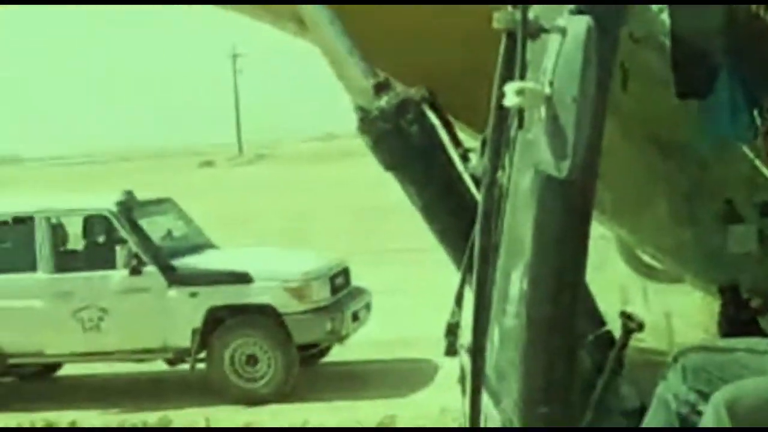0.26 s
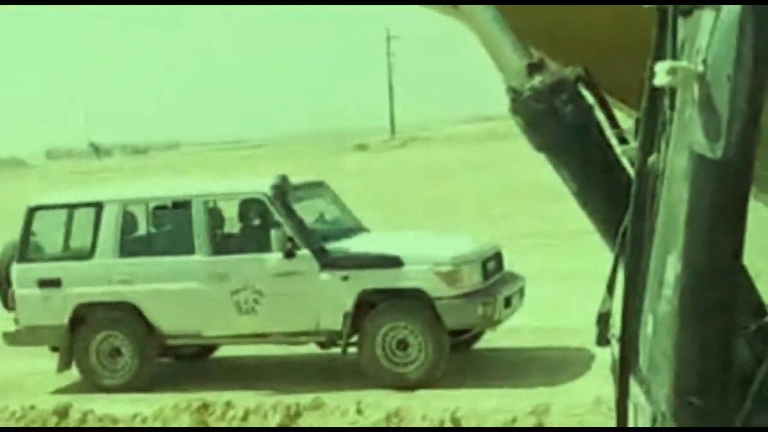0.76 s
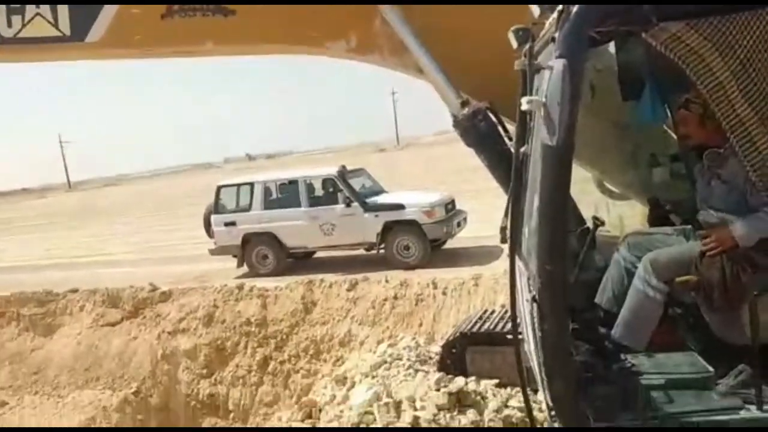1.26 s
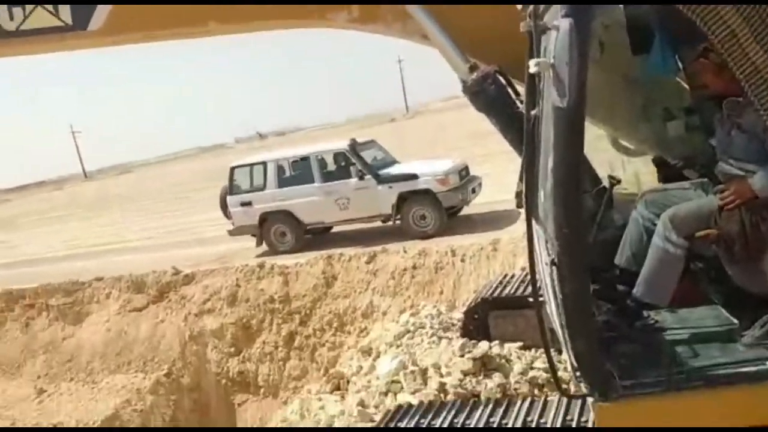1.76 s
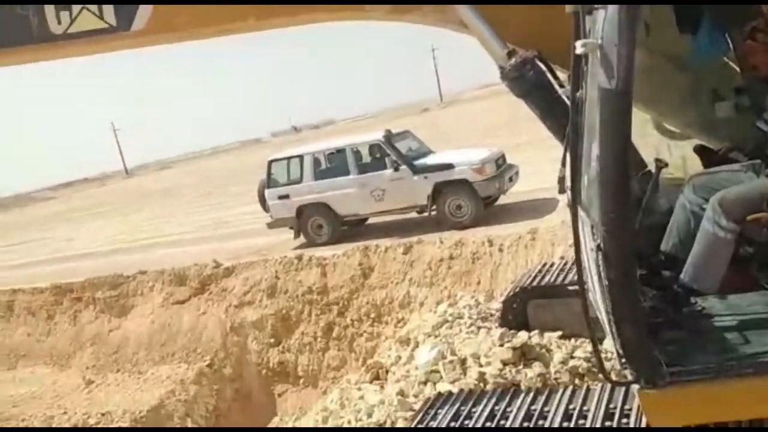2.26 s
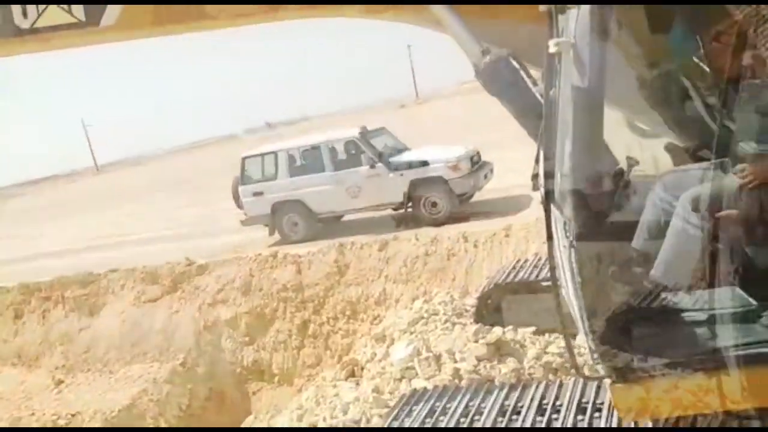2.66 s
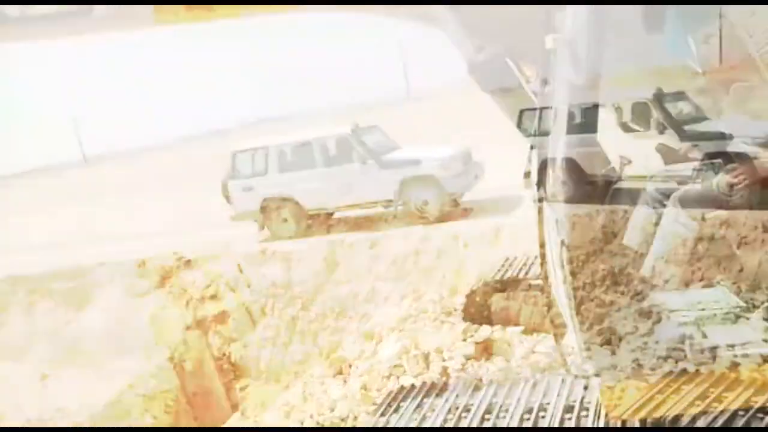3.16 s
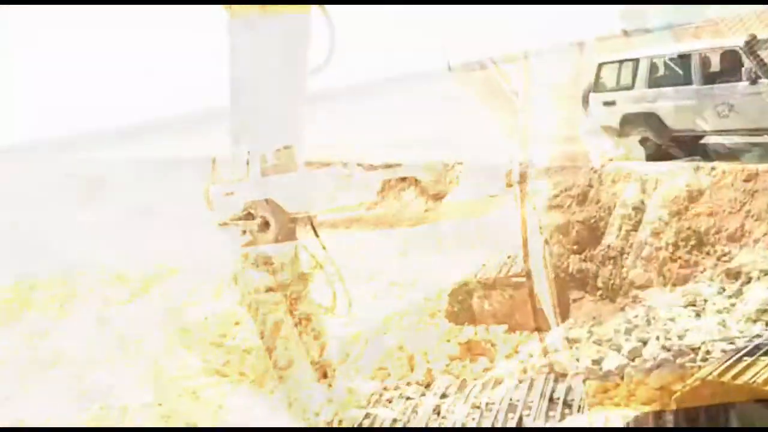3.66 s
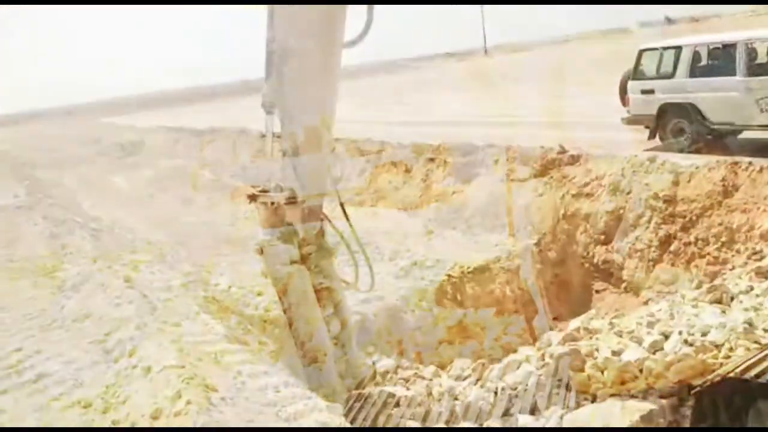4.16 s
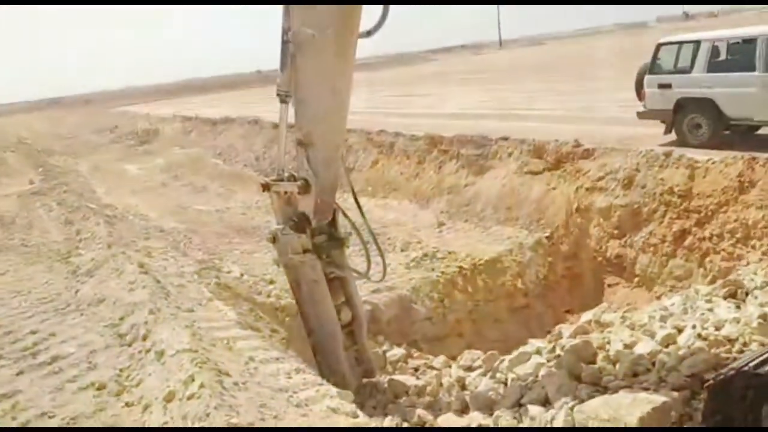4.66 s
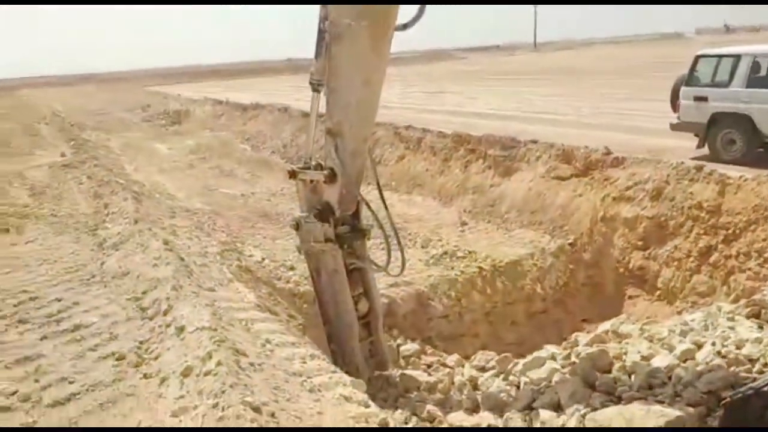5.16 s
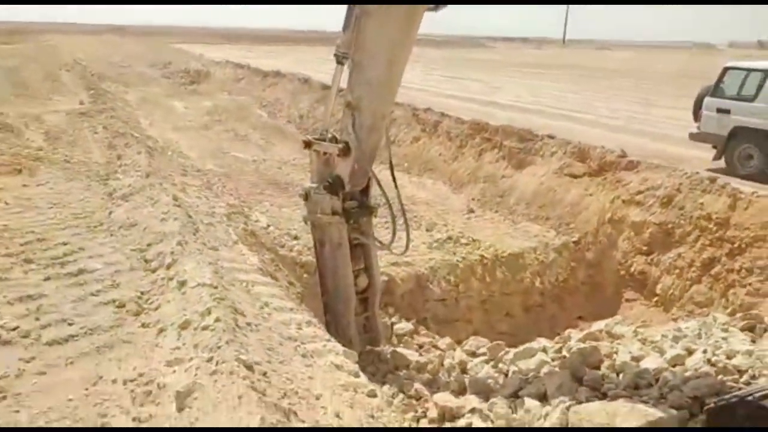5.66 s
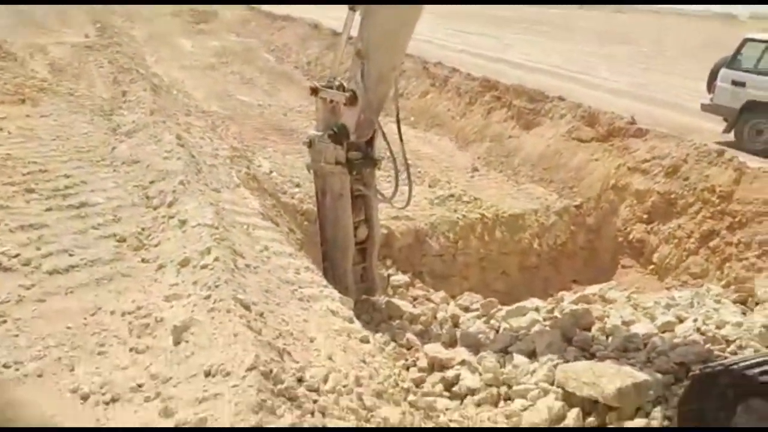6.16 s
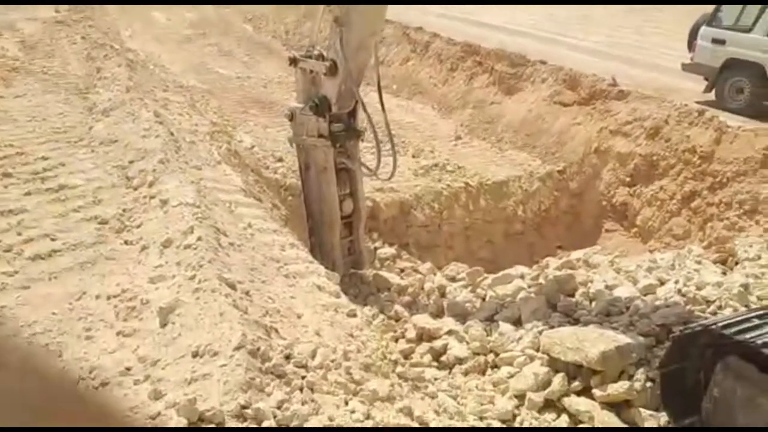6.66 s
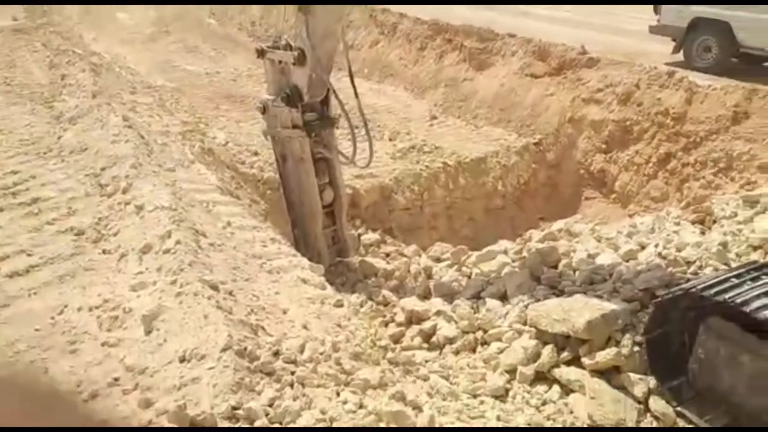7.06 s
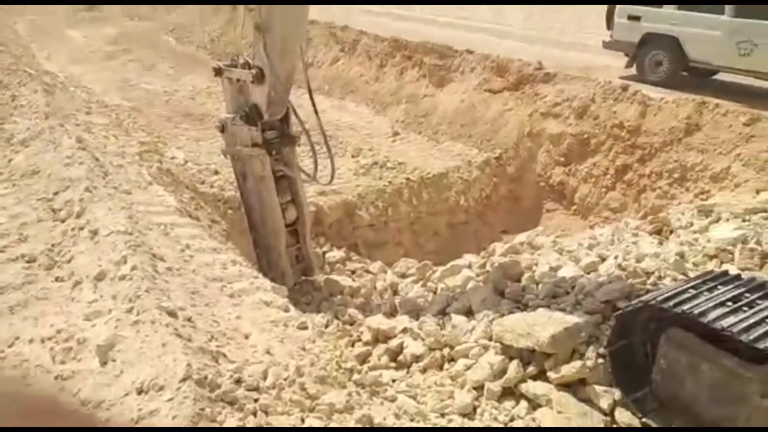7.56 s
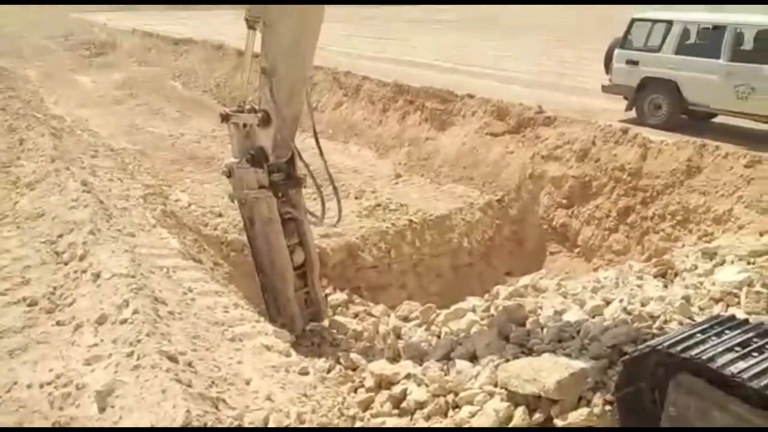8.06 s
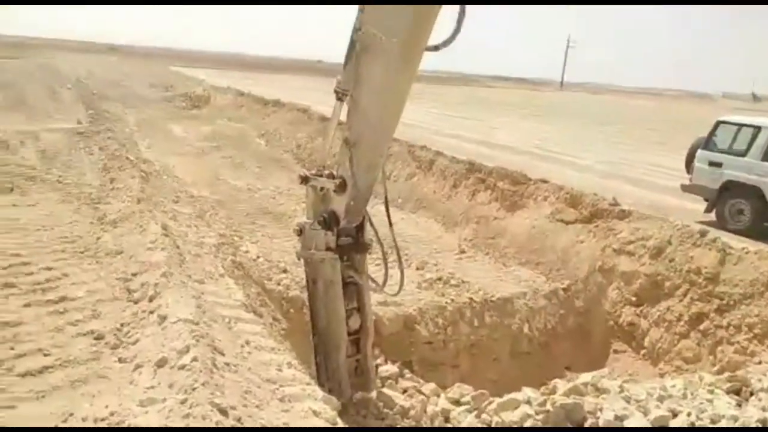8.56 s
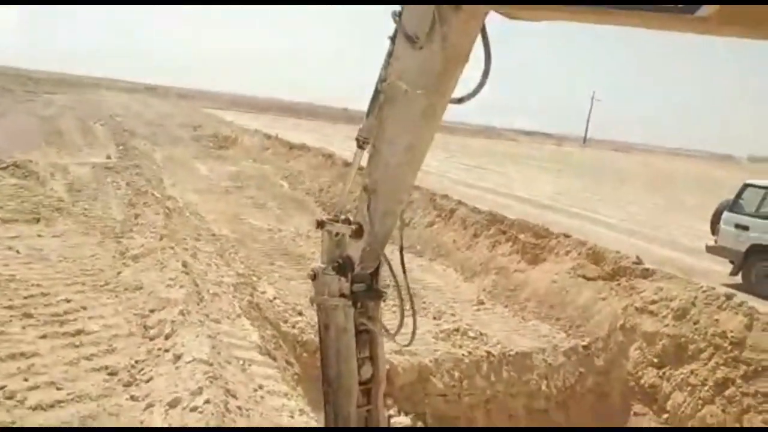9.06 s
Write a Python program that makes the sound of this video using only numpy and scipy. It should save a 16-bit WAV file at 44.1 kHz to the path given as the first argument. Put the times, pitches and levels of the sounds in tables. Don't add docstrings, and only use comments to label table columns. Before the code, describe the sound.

An excavator's hydraulic breaker hammers rock in ringing, crunching blows over a roaring diesel engine, then pauses with squeals and clanks before loose strikes.

```python
import sys
import numpy as np
from scipy import signal
from scipy.fft import rfft, irfft
from scipy.io import wavfile
from scipy.ndimage import uniform_filter1d, minimum_filter1d, map_coordinates

SR = 44100
rng = np.random.default_rng(int(sys.argv[2]) if len(sys.argv) > 2 else 0)


def transcribe(signal):
    frames = np.atleast_2d(signal).T
    limited = np.clip(frames, -1, 1)
    pcm = np.round(limited * 32767).astype(np.int16)
    wavfile.write(sys.argv[1], SR, pcm)


def undo_db(level):
    steps = np.asarray(level, float) / 20
    return 10 ** steps


N = 410130
T, HZ = np.arange(N) / SR, np.fft.rfftfreq(N, 1 / SR)

# time in s, delay in samples of first breaker, second breaker, machine body.
LATE = [(0, 17, 14, -20), (2.3, 14, 14, -20), (4, 15, 3, -20), (5.2, 15, 0, -20), (6.5, 15, 0, -20),
        (7.5, 15, -18, -19), (9.3, 15, -18, -16)]
# time in s, firings per s.
SPEED = [(0, 88), (1.7, 88), (3.5, 87.5), (6.2, 87.3), (6.9, 88), (8.1, 87), (9.3, 87.5)]


def evened(x):
    return x / np.sqrt(np.mean(x ** 2) + 1e-20)


def read(points, hz):
    f, value = np.transpose(points)
    return np.interp(np.log(hz + 1), np.log(f + 1), value)


def curve(rows, axis):
    rows = np.array(rows)
    return np.interp(T, rows[:, 0], rows[:, axis])


def noise(gain):
    return irfft(rfft(rng.standard_normal((2, N))) * gain, N)


def drift(hz):
    return evened(irfft(rfft(rng.standard_normal(N)) / (1 + (HZ / hz) ** 4), N))


def train(times_s, db):
    out = np.zeros(N)
    out[np.round(times_s * SR).astype(int)] = undo_db(db)
    return out


def span(start_s, length_s, edge_s):
    return np.clip(np.minimum(T - start_s, start_s + length_s - T) / edge_s, 0, 1)


def ring(modes, clicks, push_s, fresh, hold):
    t = np.arange(SR // 3) / SR
    body = 0
    for k, (hz, db, t60_s) in enumerate(modes):
        phases = [[0], [k * 2.6]]
        body = body + undo_db(db - 60 * t / t60_s / hold) * np.sin(2 * np.pi * hz * t + phases)
    shape = np.exp(-t[:2000] / push_s)
    shape = shape / np.linalg.norm(shape)
    rattle = fresh * signal.oaconvolve(clicks, shape)[:N] * rng.standard_normal(N)
    swing_up = 1 - np.exp(-t / push_s)
    return signal.oaconvolve((clicks + rattle)[None], body * swing_up, axes=1)[:, :N]


def roar(level):
    # frequency in Hz, level in dB per Hz.
    engine_spectrum = [(25, -36), (60, -3.5), (250, 3), (430, -8), (775, -7), (1290, -15), (2070, -16),
                       (3000, -29.5), (3900, -31), (5500, -28), (6900, -34), (9000, -57.5), (12000, -64.5),
                       (15000, -60)]
    frames = N // 128 + 5
    patches = uniform_filter1d(rng.standard_normal((257, frames)), 6, 0)
    patches = evened(uniform_filter1d(patches, 20, 1))
    bed = signal.stft(noise(undo_db(read(engine_spectrum, HZ))), nperseg=512, noverlap=384)[2]
    bed = bed * undo_db(1.33 * patches[:, :bed.shape[2]])
    bed = signal.istft(bed, nperseg=512, noverlap=384)[1][:, :N]
    throb = 1 + 0.15 * np.cos(2 * np.pi * np.cumsum(curve(SPEED, axis=1)) / SR)
    return undo_db(curve(level, axis=1)) * evened(bed) * throb


def hum(ratio, db, second_db, waver):
    speed_hz = ratio * curve(SPEED, axis=1) * (1 + waver * drift(hz=22.6))
    turns = 2 * np.pi * np.cumsum(speed_hz) / SR
    tone = np.sin(turns) + undo_db(second_db) * np.sin(2 * turns)
    return undo_db(db - 0.5 + 0.74 * drift(hz=22.0)) * tone


def machine_tones():
    # time in s, pump level in dB.
    pump_load = [(0, -27.5), (1.4, -29.5), (1.9, -47), (4.1, -37), (6.5, -24.5), (7.1, -28), (7.4, -34),
                 (9.3, -48)]
    tones = hum(0.99, db=-28, second_db=-22, waver=0.0042)
    tones += hum(2.585, db=-24.5, second_db=-9.5, waver=0.01246)
    tones += hum(3, curve(pump_load, axis=1), second_db=-2.5, waver=0.015)
    return np.array([tones, np.roll(tones, 13)])


def wind():
    # time in s, level in dB.
    wind_level = [(0, -37.5), (1.92, -36), (2.02, -25), (3.3, -35), (3.7, -29), (5.4, -30.5), (6.4, -38),
                  (8.73, -36.5), (9.07, -25), (9.3, -34)]
    gust = evened(noise((HZ / 30) ** 2 / (1 + (HZ / 45) ** 4)))
    return undo_db(curve(wind_level, axis=1) + 0.5 + 2.2 * drift(hz=6)) * (gust[0] + 0.2 * gust)


def crunch(thumps, cracks, alike, rise_s=0.0002, gritty_db=-0.5):
    # frequency in Hz, level in dB per Hz.
    crunch_spectrum = [(60, -16.5), (200, -8.5), (700, -6.5), (1100, -8), (1600, -9), (2600, -11),
                       (3500, -17), (6000, -18.5), (7500, -30), (10000, -47.5), (15000, -51)]
    # band centre in Hz, t60 in s.
    crunch_decay = [(200, 0.35), (600, 0.5), (1400, 0.24), (2800, 0.12), (5500, 0.13), (10000, 0.081)]
    centres = np.log(np.transpose(crunch_decay)[0])
    gain = undo_db(read(crunch_spectrum, HZ))
    full = rfft(rng.standard_normal((2, N))) * gain / np.sqrt(np.mean(gain ** 2))
    unit = signal.unit_impulse(SR // 3)
    out, habit = np.zeros((2, N)), np.zeros((2, 2, len(unit)))
    for k, (hz, t60_s) in enumerate(crunch_decay):
        share = np.interp(np.log(HZ + 1), centres, np.arange(len(centres)) == k)
        band = irfft(full * share, N)
        fall = undo_db(-60 / t60_s / SR)
        swell = np.exp(-1 / (rise_s + 0.15 / hz) / SR)
        shape = [1 - swell], np.convolve([1, -fall], [1, -swell])
        out += band * signal.lfilter(*shape, thumps if k < 3 else cracks)
        habit[int(k >= 3)] += band[:, -len(unit):] * signal.lfilter(*shape, unit)
    blows = np.array([[thumps], [cracks]])
    repeated = signal.oaconvolve(blows, habit, axes=2).sum(0)[:, :N]
    return (np.sqrt(1 - alike ** 2) * out + alike * repeated) * undo_db(gritty_db * drift(hz=150))


def run(rows, strokes):
    uneven_db = [0.75, .7, 0.9, 1.1]
    count = np.arange(strokes[-1] + 1)
    even = np.array([np.interp(count, strokes, column) for column in np.transpose(rows)]).T
    chance = rng.standard_normal((len(even), 4)) * uneven_db
    return even + np.pad(chance, ((0, 0), (1, 0)))


def breaker(seek, steady, boom_db, back_db, fresh, crunch_db, body_db, hold, side_db, axis, shank_db, alike):
    # frequency in Hz, level in dB, t60 in s.
    housing_modes, boom_modes = [(401.8, -13, 0.16), (452.6, -11.5, 0.43), (522.6, -12.5, 0.15),
                                 (617.4, -3, 0.52), (643.3, 3, 0.39), (682.6, -6, 0.34)], [(748, -3, 0.27), (824.6, 6, 0.12), (919, -2, 0.15),
                                                  (1070, -10, 0.43), (1160, -12, 0.17), (1274, -4, 0.11)]
    chisel_modes, tip_modes = [(1487, -13.5, 0.037), (1610, -19, 0.072), (1726, -21.5, 0.16),
                               (1800, -13.5, 0.094), (1880, -16.5, 0.19), (1920, -20, 0.072),
                               (2083, -10, 0.039), (2038, -5, 0.03), (2194, -17, 0.11),
                               (3096, -31.5, 0.086), (3730, -37, 0.057), (3800, -19, 0.077),
                               (4630, -15, 0.091), (4980, -34, 0.033)], [(2519, -1, 0.13), (2488, -6, 0.12), (2395, -13, 0.08),
                                               (2648, -10, 0.08)]
    piston_modes, side_modes, free_modes = [(2290, -12, 0.04), (2230, -14, .04)], [(3028, -3.5, 0.055), (3180, -26, 0.05),
                                                            (2295, 4, 0.041), (3680, -24, 0.032),
                                                            (4670, -34, 0.06)], [(351, -4.5, 0.17),
                                                                              (523.4, -5, 0.16),
                                                                              (857, -2, 0.15),
                                                                              (1020, 1, 0.19),
                                                                              (1147, 0, 0.16),
                                                                              (1650, -9, 0.052)]
    collar_modes, shank_modes = [(1352, -3, .33), (2506, -6, .2), (1297, -4, .2)], [(749, 1, 0.21), (779, -1, 0.15), (721, -9.5, 0.41),
                                                 (1052, -9, .25), (2028, -10, 0.13), (454.3, -8, 0.22)]
    # time in s, level in dB.
    sunk = [(0, -40), (4.2, -24), (4.85, -12), (5.6, -10), (6.2, -10), (6.3, -40), (9.3, -40)]
    s, rock_db, housing_db, chisel_db, tip_db = np.vstack([seek, steady]).T
    at = (s * SR).astype(int)
    loose = np.arange(len(s)) < len(seek)
    returns = s < 6.2
    back = train(s[returns] + 0.056, (rock_db + back_db)[returns])

    steel = undo_db(1.5) * ring(housing_modes, train(s, housing_db), push_s=0.0035, fresh=fresh, hold=hold)
    boom_blows = train(s, rock_db + np.where(loose, 4.5, 0.14 * (tip_db - rock_db + 4.5)))
    steel += undo_db(boom_db) * ring(boom_modes, boom_blows, push_s=0.0095, fresh=fresh, hold=hold)
    chisel_blows = train(s, chisel_db) + back
    steel += undo_db(6.5) * ring(chisel_modes, chisel_blows, push_s=0.00058, fresh=fresh + 0.22, hold=hold)
    tip_blows = train(s[~loose], tip_db[~loose])
    steel += undo_db(9.0) * ring(tip_modes, tip_blows, push_s=0.005, fresh=0.86 * fresh, hold=hold)
    loose_tip_blows = train(s[loose], tip_db[loose])
    steel += undo_db(13.5) * ring(tip_modes, loose_tip_blows, push_s=0.0062, fresh=0.29, hold=0.55)
    steel += undo_db(18.5) * ring(piston_modes, back, push_s=0.0022, fresh=fresh, hold=hold)
    seated = [*collar_modes, *shank_modes]
    seated_blows = train(s, curve(sunk, axis=1)[at])
    steel += undo_db(shank_db) * ring(seated, seated_blows, push_s=0.0029, fresh=0.1, hold=0.74)
    aside_db = 0.9 * (np.maximum(curve(LATE, axis=axis)[at], 0) - LATE[0][1])
    whip_db = tip_db + side_db + aside_db + np.where(loose, 12.5, 7)
    steel += ring(side_modes, train(s, whip_db), push_s=0.001, fresh=0.25, hold=0.7)
    free_blows = train(s[loose], (rock_db + housing_db)[loose] / 2)
    steel += undo_db(1.0) * ring(free_modes, free_blows, push_s=0.0039, fresh=1.0, hold=0.76)

    thumps = train(s, rock_db + body_db + 3 * loose)
    cracks = undo_db(crunch_db) * (train(s, rock_db) + back)
    return steel + crunch(thumps, cracks, alike)


def first_breaker():
    # time in s, force in dB, ring of housing in dB, of chisel in dB, of its tip in dB.
    seek_rows, run_rows = [(0.0283, -15, -13.5, -4.5, -17.5), (0.1645, -15.5, -10, -15, -21),
                           (0.2907, -14.5, -10, -5, -20), (0.4424, -16, -11, -8, -15.5),
                           (0.6804, -23, -17.5, -10, -22), (1.063, -18.5, -9, -25, -16.5),
                           (1.3075, -16.5, -13, -22, -15), (1.761, -17.5, -14, -25, -19),
                           (1.9614, -13.5, -12, -19, -18), (2.1236, -13.5, -10, -20, -17),
                           (2.2628, -15, -16, -18, -16), (2.3905, -17, -13.5, -28, -18),
                           (3.128, -23, -17, -26, -30)], [(2.5102, -17, -21, -29, -18),
                                               (2.856, -14.5, -12.5, -15, -14),
                                               (3.0844, -22, -20, -27, -24), (3.7394, -22.5, -26, -22, -26),
                                               (3.8534, -16, -16, -27, -18), (4.0936, -14, -13, -30, -14.5),
                                               (4.4263, -16.5, -10.5, -27, -16.5),
                                               (4.7496, -18.5, -22, -23, -16)]
    run_strokes = [0, 3, 5, 11, 12, 14, 17, 20]
    return breaker(seek_rows, run(run_rows, run_strokes), boom_db=3.5, back_db=-22.0, fresh=0.45,
                   crunch_db=5.5, body_db=5.0, hold=0.46, side_db=-1.5, axis=1, shank_db=-33, alike=0.5)


def second_breaker():
    # time in s, force in dB, ring of housing in dB, of chisel in dB, of its tip in dB.
    seek_rows, run_rows = [(6.3295, -12.5, -15, -10.5, -13), (8.7789, -10, -12, -34, -13.5),
                           (8.9351, -8.5, -27, -42, -10.5), (9.0638, -12, -13, -41, -14.5),
                           (9.1865, -9.5, -31, -23, -2)], [(2.1999, -12, -11, -12, -18), (2.4204, -13, -12, -12, -22),
                                                (2.8614, -13, -13.5, -9.5, -27),
                                                (3.1782, -11, -10.5, -6.5, -25.5),
                                                (3.5034, -8.5, -10.5, -6, -17), (3.937, -11, -11, -9, -33),
                                                (4.377, -10, -12, -13, -26), (4.707, -12, -14, -12, -28),
                                                (4.8174, -8, -11, -15.5, -29), (5.154, -8, -9.5, -13, -33),
                                                (5.602, -8.5, -12.5, -2, -18.5),
                                                (6.157, -9, -13, -6.5, -16.5)]
    run_strokes = [0, 2, 6, 9, 12, 16, 20, 23, 24, 27, 31, 36]
    return breaker(seek_rows, run(run_rows, run_strokes), boom_db=-1.0, back_db=-21, fresh=0.067,
                   crunch_db=6.0, body_db=0.5, hold=0.92, side_db=4.5, axis=2, shank_db=1.5, alike=0.75)


def squeal(start_s, length_s, hz, db, half_db, bend):
    slip_multiples, slip_multiples_db = [.5, 1, 1.5, 2, 2.5], [1, 4, -12.5, -31, -16]
    t = np.arange(round((length_s + 0.044) * SR)) / SR
    gate = np.clip(t / 0.0048, 0, 1) * undo_db(-700 * np.maximum(t - length_s, 0))
    slips = evened(uniform_filter1d(rng.standard_normal((2, len(t))), size=200, axis=1))
    pitch = 0.995 + 0.0034 * np.sin(t / 0.013 + start_s) + bend * np.sin(np.pi * t / t[-1])
    turns = 2 * np.pi * hz * np.cumsum(pitch) / SR
    tone = np.zeros(len(t))
    for k, step_db in zip(slip_multiples, slip_multiples_db):
        if k * hz < SR / 2:
            rough = (0.62 + 0.2 * slips[0]) * np.sin(k * turns) + 0.55 * slips[1] * np.cos(k * turns)
            tone += undo_db(step_db + half_db * (k % 1 > 0)) * rough
    return round(start_s * SR), undo_db(db + 2.0) * gate * tone


def pins():
    # start in s, peak in dB, length in s.
    clank_events = [
        (6.5, -10, 0.052),
        (7.593, -14.5, 0.029),
        (7.771, -16.5, 0.058),
        (7.858, -15, 0.024),
        (8.405, -12, 0.051),
        (8.495, -6.5, 0.05),
    ]
    # frequency in Hz, level in dB per Hz.
    clank_spectrum = [(60, -1), (300, 13), (2000, 0), (4000, 4), (6500, 6), (8000, -12), (11000, -33),
                      (15000, -29)]
    # frequency in Hz, level in dB, t60 in s.
    pin_modes = [(4100, -15, .05), (2480, -8, 0.045), (6900, -26, 0.056), (5570, -15, 0.042)]
    # start in s, length in s, rms level in dB, edge in s.
    scrape_events = [
        (3.19, 0.13, -30, 0.012),
        (6.8, 0.15, -35.5, 0.024),
        (7.455, 0.67, -38, 0.13),
        (8.407, 0.11, -35, 0.008),
        (8.5, 0.13, -26.5, 0.028),
    ]
    # start in s, length in s, slip rate in Hz, rms level in dB, strong-weak share in dB.
    squeal_events = [(3.185, .1, 5220, -26.5, -10.5), (4.868, .055, 5750, -44, -37),
                     (6.82, .06, 5370, -40, -24), (6.89, .045, 5310, -39, -24),
                     (6.815, .04, 6000, -44, -30), (6.835, .04, 6930, -38, -12),
                     (8.45, .05, 12950, -46, -20), (8.51, .06, 14800, -58, -30),
                     (9.05, .06, 15300, -50, -30), (8.458, .1, 11160, -40, -30),
                     (8.41, .03, 2280, -35, -30), (8.435, .01, 5170, -36, -30),
                     (8.459, .028, 5170, -33, -30), (8.5, .07, 5170, -28, -30),
                     (8.582, .035, 5170, -31, -30), (8.497, .04, 5110, -31, 6),
                     (8.497, .012, 6200, -27, -30), (8.515, .02, 6050, -31, -30),
                     (8.533, .018, 3230, -29, -30), (8.56, .015, 4070, -33, -30),
                     (8.54, .075, 5530, -25, -30), (8.573, .04, 5340, -33, 8), (8.59, .035, 2490, -27, -30)]
    swinging_events = [
        (3.201, 0.051, 5520, -34, -6),
    ]
    bright = evened(noise(undo_db(read(clank_spectrum, HZ))))
    out, t = np.zeros((2, N)), np.arange(SR // 4) / SR
    for s, db, length_s in clank_events:
        at = slice(round(s * SR), round(s * SR) + len(t))
        burst = (1 - np.exp(-t / length_s * 18)) * np.exp(-t / length_s * 2.9)
        out[:, at] += undo_db(db - 11.5) * burst * bright[:, at]
    knocks = train(*np.transpose(clank_events)[:2])
    out += ring(pin_modes, knocks, push_s=0.0021, fresh=0.73, hold=1.8) * undo_db(-5.5)
    for s, length_s, db, edge_s in scrape_events:
        out += undo_db(db) * bright * span(s, length_s, edge_s)
    for bend, rows in [(0.0062, squeal_events), (0.049, swinging_events)]:
        for row in rows:
            start, tone = squeal(*row, bend)
            out[:, start:][:, :len(tone)] += tone
    return out


def stones():
    # start in s, level in dB, length in s.
    thud_events = [
        (7.761, -0.5, 0.023),
        (7.814, -18, 0.079),
    ]
    low = evened(noise(HZ / (HZ + 150) / (1 + (HZ / 900) * (1 + (HZ / 2800) ** 4))))
    out, t = np.zeros((2, N)), np.arange(SR // 4) / SR
    for s, db, length_s in thud_events:
        at = slice(round(s * SR), round(s * SR) + len(t))
        out[:, at] += undo_db(db) * t / length_s * np.exp(-t / length_s * 1.08) * low[:, at]
    return out


def chips():
    # start in s, length in s, rms level in dB, edge in s.
    debris_events = [
        (8.783, 0.22, -40.5, 0.046),
        (8.935, 0.356, -38.5, .03),
        (9.053, 0.038, -17.5, 0.013),
    ]
    # frequency in Hz, level in dB per Hz.
    chip_spectrum = [(1500, -11), (4000, 4), (7000, 0), (10000, -18), (13000, -26), (15200, -13),
                     (16000, -35)]
    gate = sum(undo_db(db) * span(s, length_s, edge_s) for s, length_s, db, edge_s in debris_events)
    return gate * evened(noise(undo_db(read(chip_spectrum, HZ)))) * undo_db(1.5 * drift(hz=120))


def rebounds():
    # time in s, level in dB.
    rebound_events = [
        (8.949, -13),
        (9.07, -8),
        (9.198, -15),
    ]
    # frequency in Hz, level in dB, t60 in s.
    bushing_modes = [(4700, 3, .06), (6320, -9, .06), (2519, 4, .07)]
    return ring(bushing_modes, train(*np.transpose(rebound_events)), push_s=0.0047, fresh=0.3, hold=1)


def ports(pair, axis, balance):
    # frequency in Hz, likeness of the ports from 0 to 1.
    port_likeness = [(100, 1), (300, 1), (700, 0.89), (2000, 0.55), (5000, 0.4), (12000, 0.11)]
    late = np.arange(N) - curve(LATE, axis=axis)
    left = map_coordinates(pair[0], [late], order=3, mode="nearest")
    same = np.clip(read(port_likeness, HZ), 0, 1)
    right = same * rfft(pair[0]) + np.sqrt(1 - same ** 2) * rfft(pair[1])
    return np.array([left, irfft(right * undo_db(-read(balance, HZ)), N)])


def scene():
    # frequency in Hz, difference in dB.
    balance_first, balance_engine = [(100, 2.5), (1300, -1.5), (2500, 4.5), (3900, 5.5), (5500, 15),
                                     (6900, 7), (8000, 6), (9500, -12.5), (10300, -10), (12000, -3.5)], [(100, 4.5), (430, -3), (1290, 1.5), (2070, -9.5),
                                                          (2500, -10.5), (3200, 1), (5500, 7), (6900, 4.5),
                                                          (9000, -12.5), (10300, -15.5), (14000, 1)]
    balance_breaker = [(100, -5), (1000, -0.5), (2200, -0.5), (3500, 6), (6000, 12.5), (7500, 8.5),
                       (10000, -15.5), (14000, 11)]
    # time in s, level in dB.
    roar_first, roar_second = [(0, -22), (1.9, -21), (2.1, -16), (3.5, -19), (4.75, -19), (4.85, -60),
                               (9.3, -65)], [(0, -49), (1.9, -48), (2.1, -40), (3.5, -52),
                                                     (4.75, -23), (6.3, -21.5), (8.6, -22), (9.3, -15)]
    mix = machine_tones() + wind()
    mix += ports(roar(roar_first), axis=3, balance=balance_first)
    mix += ports(first_breaker(), axis=1, balance=balance_first)
    at_rock = second_breaker() + stones() + chips() + rebounds()
    mix += ports(at_rock, axis=2, balance=balance_breaker)
    mix += ports(roar(roar_second) + pins(), axis=3, balance=balance_engine)
    return mix


def top_cut(x):
    return signal.sosfilt(signal.butter(12, 16080, fs=SR, output="sos"), x)


def record(dry):
    dry = irfft(rfft(dry) / (1 + (HZ / 15800) ** 60), N)
    peak = uniform_filter1d(-minimum_filter1d(-abs(dry).max(0), size=400), size=300)
    held = dry / np.maximum(peak / 0.77, 1) ** 0.27
    knee = 0.69
    over = np.maximum(abs(held) - knee, 0)
    rounded = np.minimum(abs(held), knee) + (1 - knee) * np.tanh(over / (1 - knee))
    finished = np.sign(held) * rounded + 0.0036
    return top_cut(finished)


dry = scene()
out = record(dry)
transcribe(out)
```